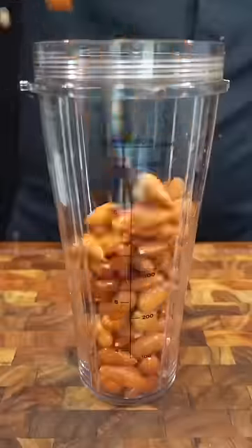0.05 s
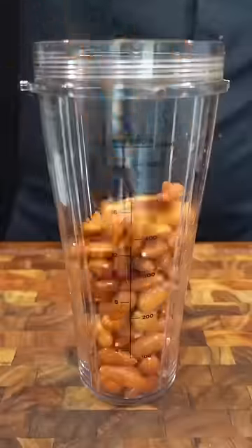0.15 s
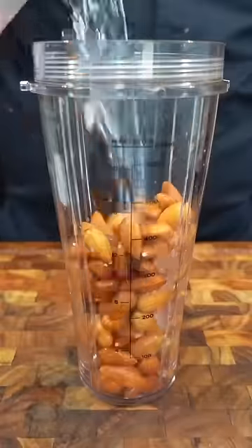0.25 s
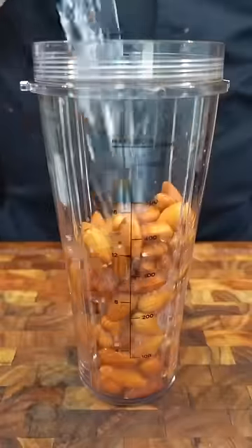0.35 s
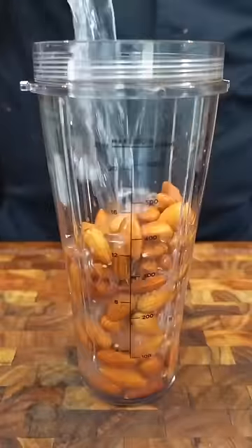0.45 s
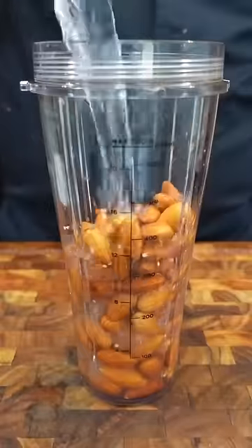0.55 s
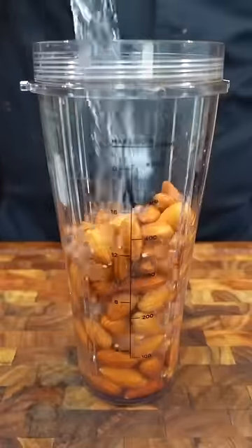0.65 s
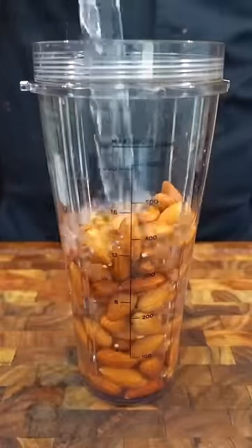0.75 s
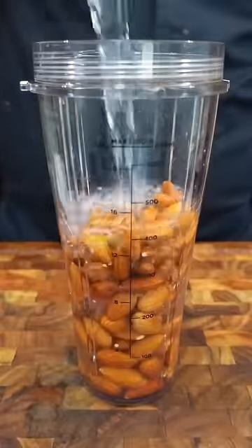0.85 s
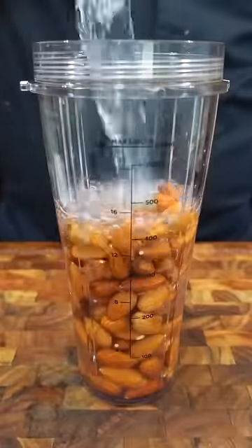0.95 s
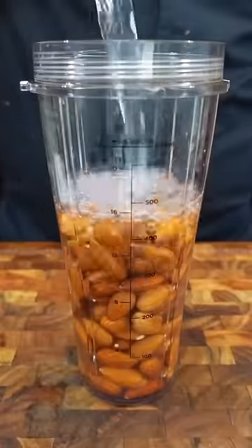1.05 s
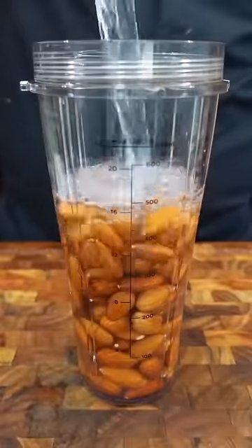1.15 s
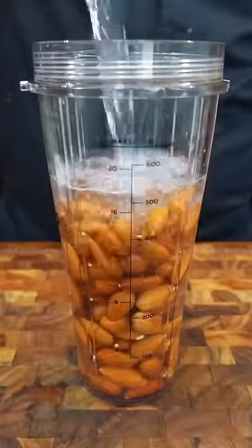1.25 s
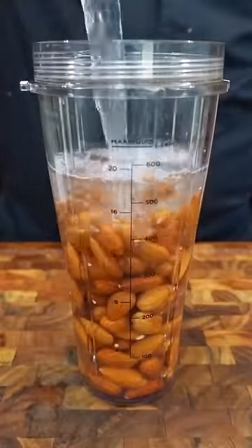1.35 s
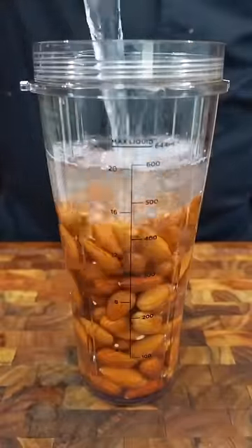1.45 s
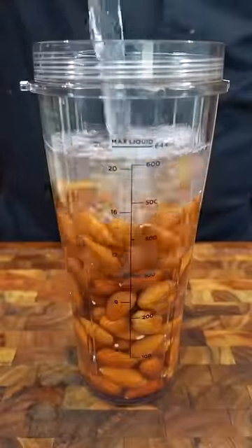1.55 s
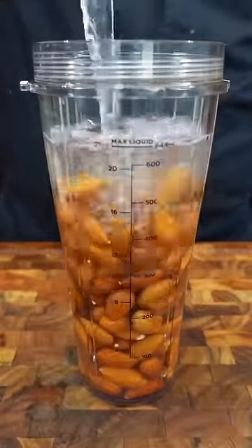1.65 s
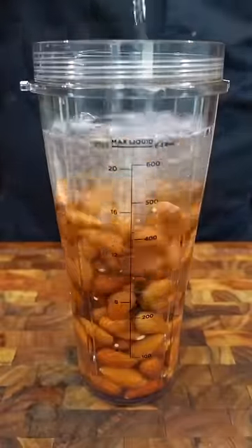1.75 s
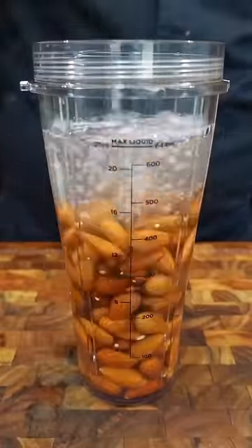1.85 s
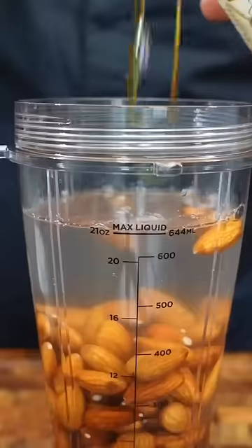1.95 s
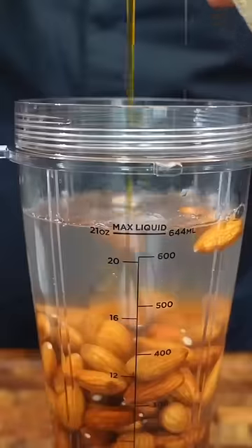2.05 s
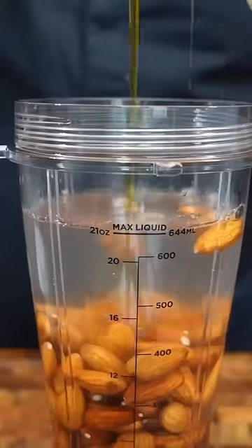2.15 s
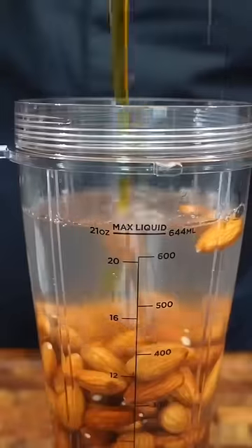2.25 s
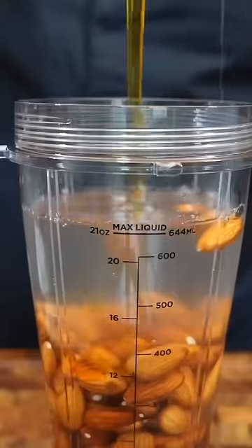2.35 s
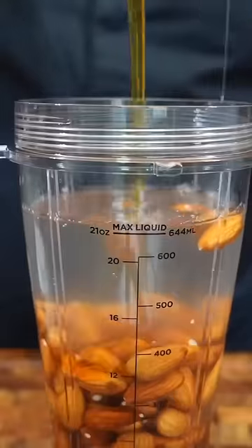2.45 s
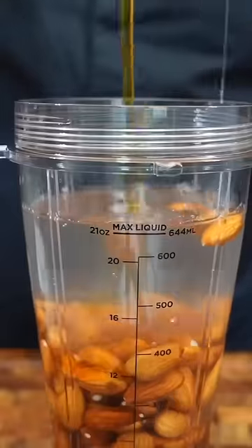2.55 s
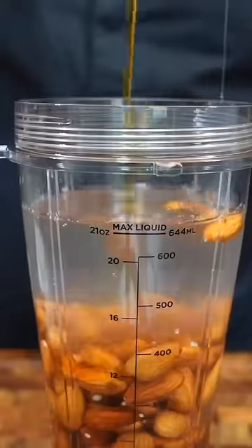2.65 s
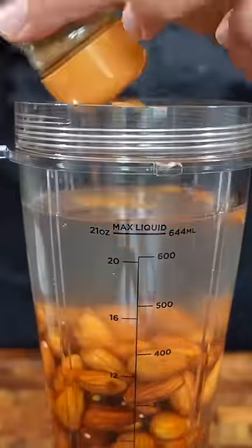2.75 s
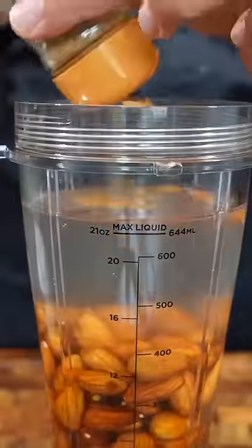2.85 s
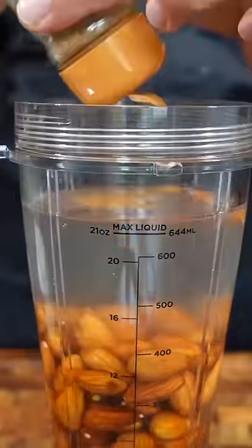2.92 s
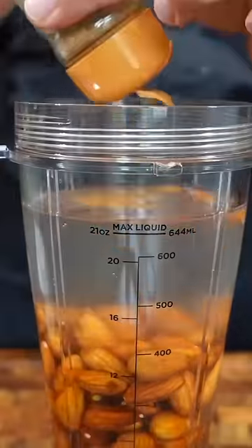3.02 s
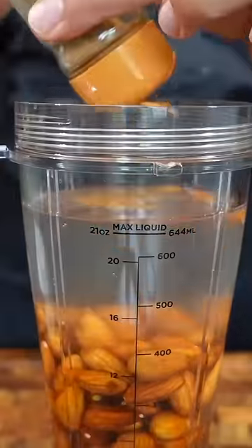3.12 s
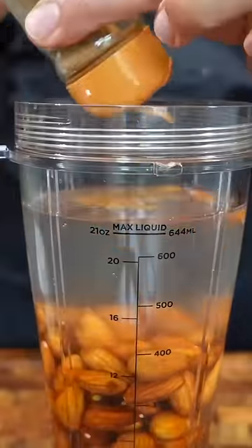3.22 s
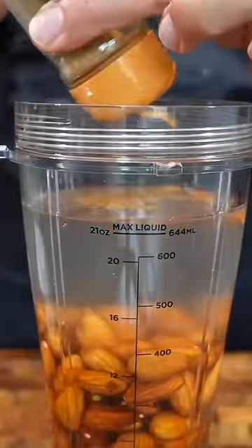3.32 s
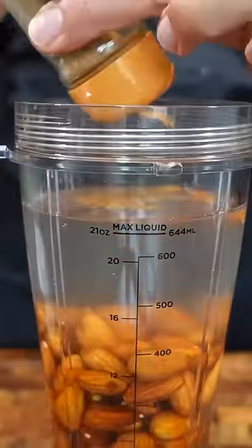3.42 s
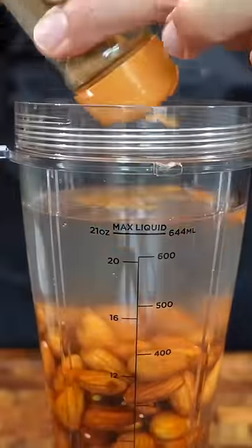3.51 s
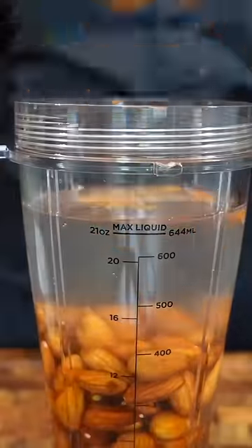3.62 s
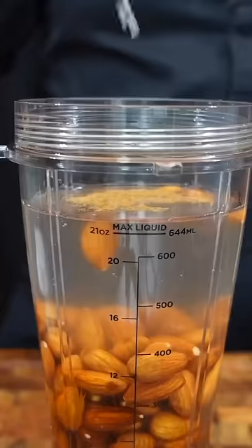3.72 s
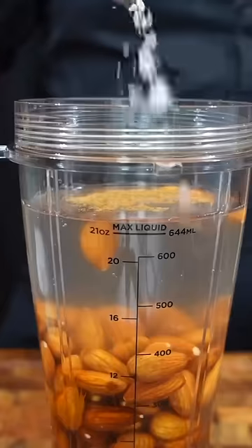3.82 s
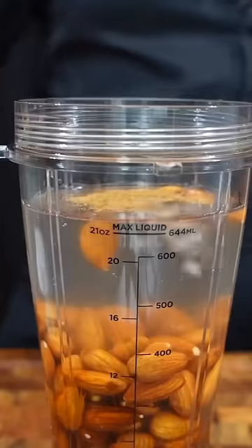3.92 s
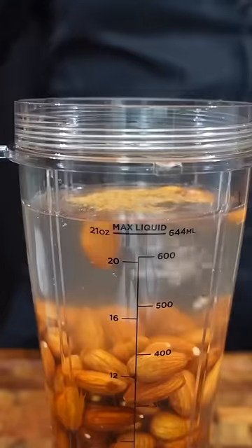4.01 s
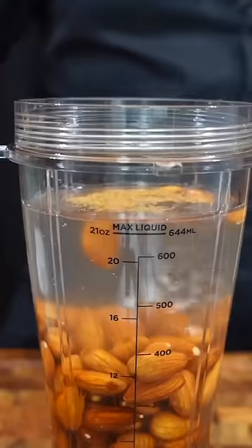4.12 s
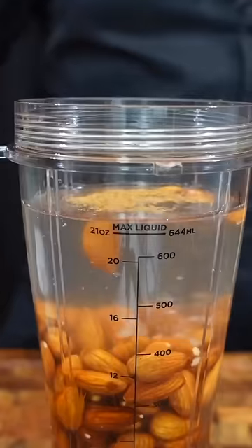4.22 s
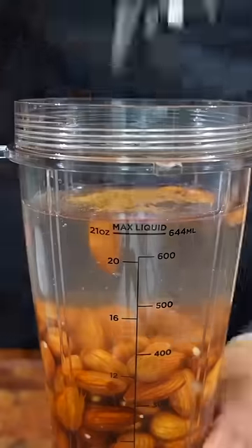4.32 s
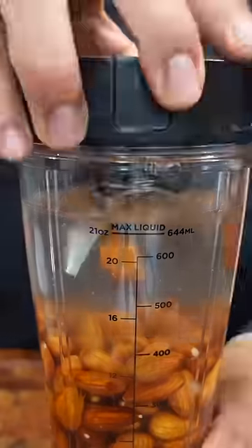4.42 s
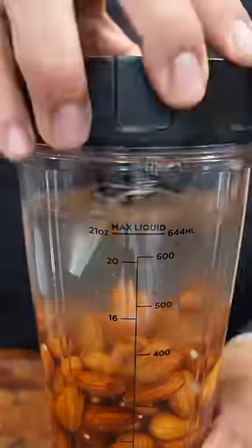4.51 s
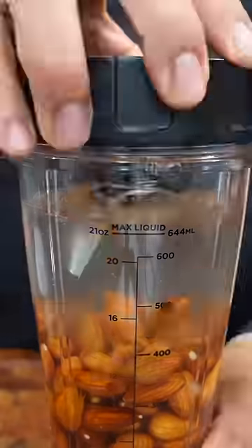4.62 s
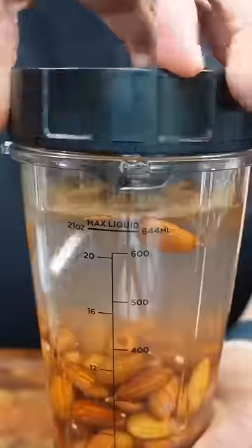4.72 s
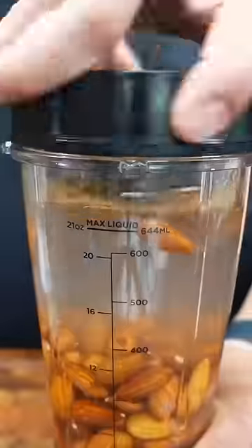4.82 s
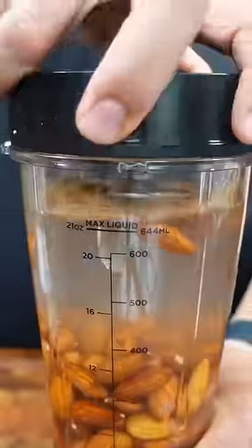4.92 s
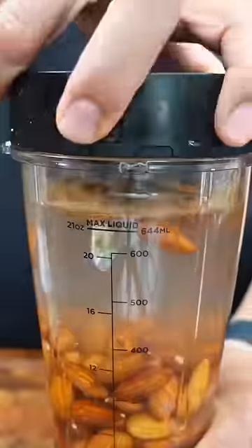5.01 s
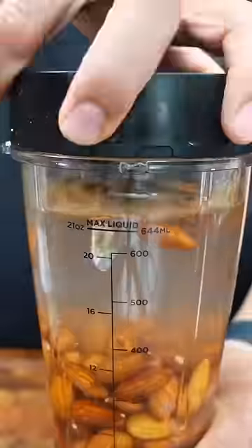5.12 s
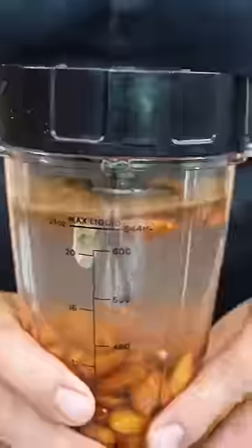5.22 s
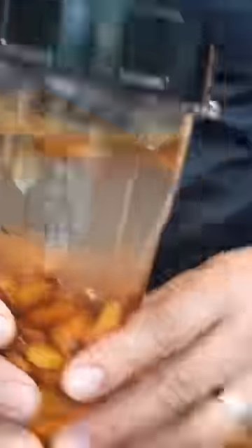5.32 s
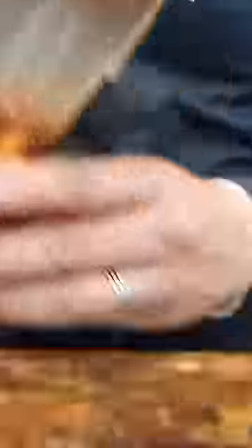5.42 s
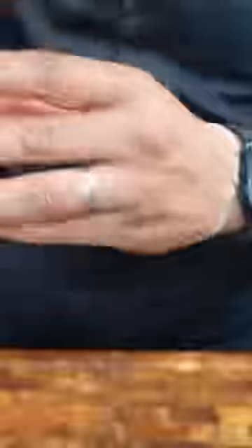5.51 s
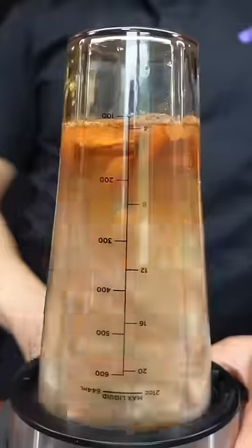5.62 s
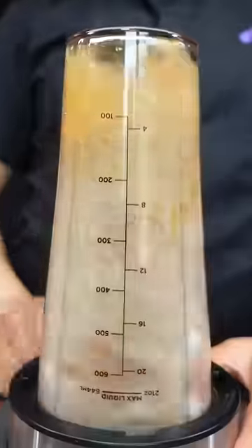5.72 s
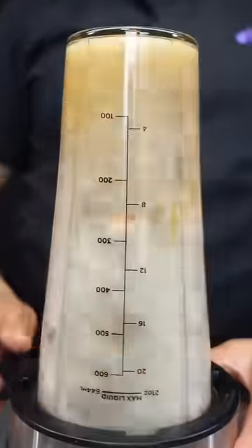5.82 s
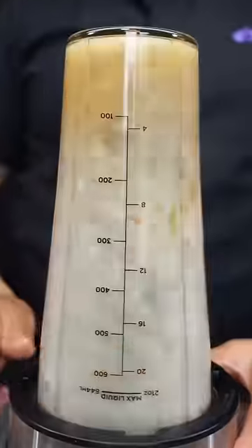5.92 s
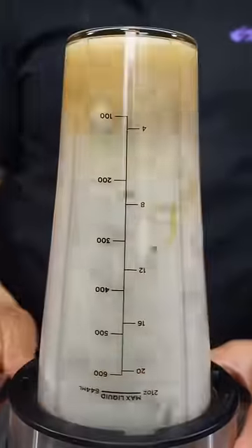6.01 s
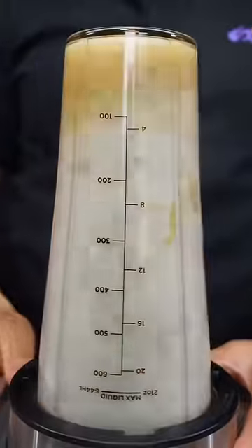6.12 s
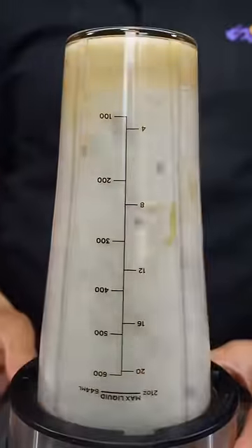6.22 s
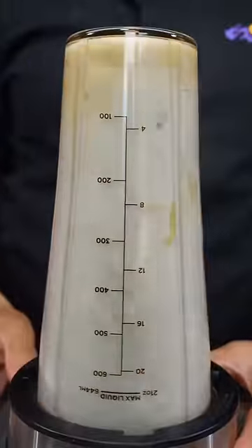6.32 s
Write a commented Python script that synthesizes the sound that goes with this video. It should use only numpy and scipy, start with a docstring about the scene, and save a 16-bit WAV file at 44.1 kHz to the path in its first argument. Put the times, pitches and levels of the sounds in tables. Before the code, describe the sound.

A close microphone in a small, lightly reverberant kitchen catches hard nuts tumbling into a plastic cup, then a surging, bubbly water pour. Quiet oil drips follow, then a row of dull finger taps on a jar with sharper ticks at the end. A lid lands with a loud plastic clack and rattle, twists tight with small knocks, and a blender motor bursts on, churning wet, crunchy nuts while its pitch climbs.

```python
"""In a small kitchen, close to the microphone, nut milk is made in a personal blender.
Almonds drum into the plastic cup as short blows and rings; water and oil follow as noise, drops and bubbles.
A spice jar is tapped with dull thumps and bright ticks, and a pinch of salt patters down.
The blade lid knocks on and is screwed tight with scrapes and clicks; then the motor's tones and
restless noise chop the nuts, and the motor gains speed as they break up."""
import sys
import numpy as np
from scipy import signal
from scipy.fft import rfft, irfft, next_fast_len
from scipy.io import wavfile
from scipy.ndimage import map_coordinates

SR = 44100
rng = np.random.default_rng(int(sys.argv[2]) if len(sys.argv) > 2 else 0)


def bounce(signal):
    """Save signal as a 16-bit WAV file at the path given by the first command-line argument."""
    frames = np.transpose(np.atleast_2d(signal))
    limited = np.clip(frames, -1, 1)
    pcm = np.round(limited * 32767).astype(np.int16)
    wavfile.write(sys.argv[1], SR, pcm)


N = 280476  # length [samples]


def amp(db):
    """Decibels to gain."""
    return 10 ** (np.asarray(db) / 20)


def unit(x):
    """Scale to rms 1."""
    return x / np.sqrt(np.mean(x ** 2) + 1e-20)


def clock():
    """The time of every sample [s]."""
    return np.arange(N) / SR


def along(points, hz):
    """Read (frequency [Hz], value) points on a log frequency axis."""
    f, v = np.transpose(points)
    return np.interp(np.log(hz + 1), np.log(f + 1), v)


def curves(rows):
    """One value per sample for each column after the time."""
    s, *cols = np.transpose(rows)
    return [np.interp(clock(), s, c) for c in cols]


def during(start, end, rise=0.0093, fall=0.033):
    """A gate with sloping edges, all times in seconds."""
    opening = np.clip((clock() - start) / rise, 0, 1)
    closing = np.clip((end - clock()) / fall, 0, 1)
    return opening * closing


def fade(start, db_per_s):
    """A level in dB that holds at 0 until start, then falls steadily."""
    return -db_per_s * np.maximum(clock() - start, 0)


def stroke(s, db, rise_db_per_s, fade_db_per_s):
    """A gain that climbs to db at time s and dies away."""
    return amp(db - rise_db_per_s * np.maximum(s - clock(), 0) + fade(s, fade_db_per_s))


def wobble(rate):
    """A smooth random curve with rate knots a second."""
    return map_coordinates(rng.standard_normal(int(N * rate / SR) + 4), [clock() * rate])


def add(track, s, sound):
    """Mix a sound into a track at time s."""
    part = track[max(round(s * SR), 0):][:len(sound)]
    part += sound[:len(part)]


def colour(x, spectrum, size=4096):
    """Pass x through a causal, minimum-phase body with the given spectrum."""
    gain = amp(along(spectrum, np.fft.rfftfreq(size, 1 / SR)))
    cepstrum = irfft(np.log(np.maximum(gain, 1e-6)))
    # folding the cepstrum forward puts the response's energy as early as possible
    cepstrum[1:size // 2] *= 2
    cepstrum[size // 2 + 1:] = 0
    response = irfft(np.exp(rfft(cepstrum)))
    return signal.fftconvolve(x, response)[:len(x)]


def patter(spectrum, rate, spread_db, wash):
    """Tiny random impacts, rate a second, over a wash of noise, rms 1."""
    strength = amp(spread_db * np.clip(rng.standard_normal(N), -2, 2))
    hits = (rng.random(N) < rate / SR) * rng.choice([-1, 1], N) * strength
    return unit(colour(unit(hits) + wash * rng.standard_normal(N), spectrum))


def patches(x, depth_db, hz_wide, seconds):
    """Moving liquid and nuts keep shifting the resonances that x passes through."""
    z = signal.stft(x, nperseg=1024)[2]
    across = np.arange(z.shape[0]) * SR / 1024 / hz_wide
    onward = np.arange(z.shape[1]) * 512 / SR / seconds
    rows, columns = np.meshgrid(across, onward, indexing="ij")
    field = map_coordinates(rng.standard_normal(z.shape), [rows, columns], mode="mirror")
    return unit(signal.istft(z * amp(depth_db * field), nperseg=1024)[1][:N])


def blow(spectrum, t60, size=4096):
    """One short contact: a decaying noise burst coloured by a body, peak 1."""
    burst = rng.standard_normal(size) * amp(-60 * np.arange(size) / SR / t60)
    sound = colour(burst, spectrum)
    return sound / np.abs(sound).max()


def ring(hz, t60, glide=0, size=4096):
    """A damped sine whose pitch drifts by the share glide over its t60."""
    t = np.arange(size) / SR
    cycles = hz * t * (1 + glide * np.minimum(t / t60, 1) / 2)
    return np.sin(2 * np.pi * cycles) * np.exp(-np.log(1000) * t / t60)


def swell(length, start_hz, end_hz, flutter):
    """A short wavering tone that rises and fades."""
    pitch = np.linspace(start_hz, end_hz, int(length * SR))
    waver = flutter * wobble(114.3)[:len(pitch)]
    return np.hanning(len(pitch)) * np.sin(2 * np.pi * np.cumsum(pitch) / SR + waver)


def bubbles(start, end, pitch, rate, scatter, cycles, spread_db):
    """A cloud of rising bubble notes around a pitch curve, about rms 1 while it lasts."""
    cloud = np.zeros(N)
    times = np.arange(start, end, 1 / rate)
    for s, (late, high, strong) in zip(times, rng.standard_normal((len(times), 3))):
        hz = np.interp(s, *np.transpose(pitch)) * np.exp(scatter * high)
        note = ring(hz, cycles / hz, glide=0.088, size=1024)
        add(cloud, s + 2 * late / rate, amp(spread_db * min(strong, 2)) * note)
    return unit(cloud) * np.sqrt((end - start) * SR / N)


# how long the small kitchen rings: (frequency [Hz], t60 [s])
WALLS = [(150, 0.27), (1000, 0.33), (7000, 0.28), (13000, 0.14)]


def room(x, wet_db):
    """The sound x with the kitchen's short tail, a noise that decays at its own rate in each band."""
    hz, t, z = signal.stft(rng.standard_normal(SR // 2), SR, nperseg=256)
    decay = np.exp(-np.log(1000) * t / along(WALLS, hz)[:, None])
    tail = signal.istft(z * decay, SR, nperseg=256)[1]
    return x + amp(wet_db) * signal.fftconvolve(x, tail / np.linalg.norm(tail))[:N]


def widen(x, side_db):
    """Only the treble scatters differently to the left and the right."""
    steep = signal.ellip(10, 0.5, 80, 4200, "high", fs=SR, output="sos")
    turn = np.exp(2j * np.pi * wobble(150))  # a randomly turning phase
    turned = np.real(signal.hilbert(x, next_fast_len(N))[:N] * turn)
    side = amp(side_db) * signal.sosfilt(steep, turned)
    return np.array([x + side, x - side])


# spectrum of the room air: (frequency [Hz], relative level [dB per Hz])
KITCHEN_AIR = [(15, -31), (25, -12), (168, -11.5), (208, -5.5), (301, -14), (436, -7.5), (568, -11),
               (702, -5), (1220, -18), (1470, -19), (4360, -34.5), (5250, -32), (5990, -34), (12600, -38.5),
               (14000, -53)]
# spectrum of the faint ticking: (frequency [Hz], relative level [dB per Hz])
TICKING = [(300, -41), (1200, -1.5), (1750, 1.5), (2300, -10.5), (2900, -9.5), (3500, -26.5), (6000, -45)]
TICKING_DB, TICKING_LOUD_DB = -64, -59
TICKING_LOUD_START_S, TICKING_LOUD_END_S = 1.95, 3.78


def kitchen():
    """The quiet air of the room is coloured noise; faint, uneven, fast clicks tick in the background."""
    air = amp(-52.5 + 0.44 * wobble(4.66)) * unit(colour(rng.standard_normal(N), KITCHEN_AIR))
    # about 52 ticks a second
    beats = np.diff(np.floor(np.cumsum(52 + 2.5 * wobble(30)) / SR), prepend=0)
    ticking = unit(colour(beats * amp(1.5 * wobble(50)), TICKING))
    louder = during(TICKING_LOUD_START_S, TICKING_LOUD_END_S)
    return air + amp(TICKING_DB + (TICKING_LOUD_DB - TICKING_DB) * louder) * ticking


# modes of the plastic cup: (frequency [Hz], level [dB], t60 [s])
CUP_MODES = [(230.3, -8, 0.4), (305, -5, 0.4), (519, -9.5, 0.3), (800, -4, 0.31), (996, -2, 0.36),
             (1300, -2, 0.4), (1470, -1, 0.43), (2550, -3, 0.2), (4230, -10, 0.39), (4460, -9, 0.45)]


def cup_ring():
    """The cup's modes after one blow, in a slightly new balance each time."""
    return sum(amp(db + rng.normal(0, 2)) * ring(hz, t60, size=12000) for hz, db, t60 in CUP_MODES)


# single almonds striking the cup wall: (time [s], level [dB])
NUT_HITS = [(0.029, -3), (0.036, -5), (0.056, -5), (0.065, -8), (0.077, -3.5), (0.096, -7.5), (0.106, -10),
            (0.121, -5.5), (0.141, -12.5), (0.252, -5)]
# the cup's bottom hums as nuts land: (time [s], length [s], start pitch [Hz], end pitch [Hz], level [dB])
BOTTOM_HUMS = [(0.214, 0.079, 262, 246, -28.5)]
# spectrum of the heap of nuts: (frequency [Hz], relative level [dB per Hz])
NUTS = [(29, -57), (50, -25), (125, -15.5), (345, -27.5), (437, -5), (528, -14), (580, 2.5), (770, -19),
        (929, -13), (2220, -17), (2620, -15), (3910, -16.5), (4510, -25), (10300, -36), (14000, -61.5)]
# spectrum of a hard clack, for nuts and water drops: (frequency [Hz], relative level [dB per Hz])
CLACK = [(40, -63), (200, -33.5), (800, -2), (1500, -3), (2800, -5), (4100, -7.5), (5000, -17.5),
         (14000, -46)]
# the heap drums steadily, then dies away as it settles
HEAP_DB, HEAP_SETTLES_S, HEAP_FADE_DB_PER_S, HEAP_END_S = -16, 0.082, 155, 0.287
NUT_HZ, NUT_SCATTER = 2800, 0.3  # a nut's own note, and its spread in log pitch
NUT_RING_DB = -36  # the cup's ring, re the hit


def almonds():
    """A heap of nuts drums into the cup as dense impacts; single nuts clack and ring, the last one late."""
    heap_gain = amp(HEAP_DB + fade(HEAP_SETTLES_S, HEAP_FADE_DB_PER_S))
    heap = heap_gain * patter(NUTS, rate=700, spread_db=2.5, wash=0.65)
    hits = np.zeros(N)
    for s, db in NUT_HITS:
        hz = NUT_HZ * np.exp(NUT_SCATTER * rng.standard_normal())
        add(hits, s, amp(db) * (blow(CLACK, t60=0.012) + 0.45 * ring(hz, t60=0.009)))
        add(heap, s, amp(db + NUT_RING_DB) * cup_ring())
    for s, length, start_hz, end_hz, db in BOTTOM_HUMS:
        add(hits, s, amp(db) * swell(length, start_hz, end_hz, flutter=0.41))
    return heap * during(0, HEAP_END_S, rise=0.00075, fall=0.01) + room(hits, wet_db=-20)


# the bubble cloud drops as the nuts go under, climbs as the cup fills: (time [s], centre pitch [Hz])
BUBBLE_PITCH = [(0.95, 3570), (1.06, 2360), (1.9, 3070)]
# the loudest single drops: (time [s], level [dB], pitch [Hz])
DROPS = [(0.621, -19.5, 1130), (0.704, -15, 1260), (0.781, -16, 1240), (0.838, -11.5, 3540),
         (0.886, -19, 3250), (0.949, -22.5, 3980), (1.03, -22, 2240), (1.271, -22.5, 2620),
         (1.335, -18.5, 2540), (1.36, -24.5, 2680), (1.721, -22.5, 1860), (1.804, -16.5, 1874)]
# air pockets that gulp: (time [s], length [s], start pitch [Hz], end pitch [Hz], level [dB])
GULPS = [(0.342, 0.12, 818, 689, -31.5), (1.428, 0.086, 493, 467, -35.5)]
# the jet surges: (time [s], gain [dB])
SURGES = [(0.395, 3.5), (0.55, 2), (0.775, 7), (1.1, 8.5), (1.345, 3), (1.45, 6.5), (1.625, 9.5),
          (1.79, 7.5), (1.9, 6.5)]
# spectra of the splash and of the fine spray: (frequency [Hz], relative level [dB per Hz])
SPLASH = [(59, -65), (100, 0), (193, -12.5), (596, -8.5), (652, -10.5), (733, -8), (834, -11.5), (1280, -1),
          (1440, -8.5), (2200, -18.5), (2860, -34), (4840, -120)]
SPRAY = [(2240, -25), (3800, -2), (4960, -6), (6040, -7), (6990, -0.5), (8330, -9), (9490, -1.5),
         (12700, -7.5), (13400, -13), (14000, -12.5)]
# the jet's layers: (level on bare nuts [dB], change once they are covered [dB], share of a surge [ratio])
SPLASH_LAW = (-35.0, -12, 0.75)
BUBBLE_LAW = (-34.5, -7, 0.8)
SPRAY_LAW = (-34.8, -17.5, 1.15)
# between the two middle times the rising water covers the nuts
POUR_START_S, COVER_START_S, COVER_END_S, POUR_END_S = 0.28, 0.86, 1.17, 1.98
POUR_RISE_S, POUR_FALL_S = 0.08, 0.08
SURGE_S = 0.028  # half width of a surge, where its dB gain has dropped to 1/e
FLOW_WOBBLE_DB, FLOW_WOBBLE_PER_S = 1.3, 22  # the jet's small random swings


def water():
    """The jet splashes on the nuts and drives ringing bubbles into the rising water."""
    covered = np.clip((clock() - COVER_START_S) / (COVER_END_S - COVER_START_S), 0, 1)
    surge_db = FLOW_WOBBLE_DB * wobble(FLOW_WOBBLE_PER_S)
    for s, db in SURGES:
        surge_db += db * np.exp(-((clock() - s) / SURGE_S) ** 2)
    splash_gain, bubbles_gain, spray_gain = [
        amp(bare_db + change_db * covered + share * surge_db)
        for bare_db, change_db, share in (SPLASH_LAW, BUBBLE_LAW, SPRAY_LAW)]

    large_pitch, bead_pitch = [(0.3, 1350), (1.9, 1250)], [(0.3, 8000), (1.9, 8000)]
    large = bubbles(0.3, 2.0, large_pitch, rate=220, scatter=0.18, cycles=24, spread_db=5)
    small = bubbles(0.3, 2.0, BUBBLE_PITCH, rate=260, scatter=0.11, cycles=48, spread_db=6)
    froth = bubbles(0.3, 1.8, BUBBLE_PITCH, rate=1200, scatter=0.248, cycles=22, spread_db=1.5)
    beads = bubbles(0.3, 2.0, bead_pitch, rate=600, scatter=0.2, cycles=70, spread_db=5)

    splash = 0.75 * patter(SPLASH, rate=400, spread_db=3.5, wash=0.47) + 0.59 * large
    mist = patter(SPRAY, rate=1300, spread_db=6.5, wash=0.91)
    spray = 0.89 * patches(mist, depth_db=3.0, hz_wide=600, seconds=0.04) + 0.52 * beads
    jet = splash_gain * splash + bubbles_gain * (0.61 * small + 0.42 * froth) + spray_gain * spray
    jet *= during(POUR_START_S, POUR_END_S, rise=POUR_RISE_S, fall=POUR_FALL_S)

    for s, db, hz in DROPS:
        drop = 0.81 * ring(hz, t60=0.027, glide=0.067) + 0.55 * blow(CLACK, t60=0.024)
        add(jet, s, amp(db) * drop)
    for s, length, start_hz, end_hz, db in GULPS:
        add(jet, s, amp(db) * swell(length, start_hz, end_hz, flutter=1.6))
    # such small bubbles radiate no bass
    no_bass = signal.butter(N=3, Wn=220, btype="high", fs=SR, output="sos")
    return room(signal.sosfilt(no_bass, jet), wet_db=-8.5)


# oil drips: (time [s], level [dB])
DRIPS = [(2.084, -22), (2.101, -33.5)]
# spectra of a drip and of the oil stream: (frequency [Hz], relative level [dB per Hz])
PLIP = [(2000, -20), (3300, 6), (4200, 1), (6000, -18), (11000, -16), (14000, -30)]
OIL = [(59, -55), (100, -15), (212, -40), (326, -0.5), (736, -17.5), (815, -21), (1110, -5), (1960, -40),
       (2300, -15), (3600, -32.5), (13000, -43)]


def oil():
    """Two drips tick as short blows, and a thin stream trickles softly into the water."""
    drips = np.zeros(N)
    for s, db in DRIPS:
        add(drips, s, amp(db) * blow(PLIP, t60=0.0084))
    stream = amp(-51.5 + 2.9 * wobble(8.18)) * patter(OIL, rate=250, spread_db=4.0, wash=1.0)
    return stream * during(1.943, 2.79, rise=0.12) + room(drips, wet_db=-17)


# a finger taps the spice jar, harder towards the end: (time [s], thump level [dB], tick level [dB])
TAPS = [(2.81, -33, -56), (2.923, -21.5, -29), (3.038, -26.5, -39), (3.136, -22, -36), (3.237, -20, -25),
        (3.339, -19, -31), (3.442, -17.5, -21), (3.545, -16, -10.5)]
# spectra of the jar's knock, its bright tick and the powder: (frequency [Hz], relative level [dB per Hz])
JAR_KNOCK = [(100, -24), (350, -3.5), (650, 3.5), (1000, -10), (2500, -19), (6000, -37)]
JAR_TICK = [(1000, -29), (2500, -20), (5200, -22), (6300, -3), (7400, -5), (8800, -6.5), (10200, -5.5),
            (14000, -23)]
POWDER = [(59, -55), (100, -10), (166, -9), (399, -1.5), (510, -3), (798, -7.5), (979, -1), (1500, -11.5),
          (1770, -17), (2500, -16), (5420, -42), (7660, -32.5), (13000, -38)]
PUSH_S, PUSH_START_HZ, PUSH_END_HZ = 0.0165, 320, 122  # the thump's length and falling pitch
FIRM_TAP_DB = -18  # the thump of a firm tap
KNOCK_DB, KNOCK_GROWS = -19.5, 1.5  # the jar's knock at a firm tap, and its dB per dB of thump
PUFF_DB, PUFF_S = -26.5, 0.038  # the powder's puff re the tick, and its decay time to 1/e


def spice():
    """Each tap thumps the jar, clicks its cap and puffs out powder; harder taps are mostly brighter."""
    thumps, notes, ticks, puffs = np.zeros((4, N))
    puff = np.exp(-np.arange(SR // 2) / SR / PUFF_S)
    for s, db, tick_db in TAPS:
        knock_db = KNOCK_DB + KNOCK_GROWS * (db - FIRM_TAP_DB)
        # a short dull push that sags in pitch, then the jar's faint note
        push = swell(PUSH_S, PUSH_START_HZ, PUSH_END_HZ, flutter=0)
        add(thumps, s - 0.002, amp(db) * push)
        add(notes, s, amp(db - 22) * ring(292, t60=0.4, size=8192))
        add(thumps, s, amp(knock_db) * blow(JAR_KNOCK, t60=0.015))
        add(ticks, s, amp(tick_db) * blow(JAR_TICK, t60=0.017))
        add(puffs, s, amp(tick_db + PUFF_DB) * puff)
    hiss = puffs * patter(JAR_TICK, rate=2200, spread_db=2, wash=0.67)
    powder = amp(-45.5 + 1.9 * wobble(14)) * patter(POWDER, rate=1500, spread_db=6.5, wash=0.96)
    powder *= during(2.8, 3.78, rise=0.024)
    return room(thumps, wet_db=-15) + notes + ticks + hiss + powder


def salt():
    """A pinch of crystals lands on the water as a brief bright patter."""
    crystals = patter(SPRAY, rate=360, spread_db=-7, wash=0.69)
    return amp(-50.5) * crystals * during(3.925, 4.01, rise=0.043, fall=0.058)


# the lid lands and bounces: (time [s], thud level [dB], clack level [dB])
LID_HITS = [(4.488, -19.5, -4), (4.505, -11.5, -13.5), (4.511, -11, -9.5), (4.519, -14, -7.5),
            (4.526, -21, -11)]
# spectra of the lid's thud, its clack and the rattling cup: (frequency [Hz], relative level [dB per Hz])
THUD = [(40, -40), (120, 1), (400, 2.5), (700, -7.5), (1300, -18), (4000, -70)]
LID_CLACK = [(40, -64), (300, -25), (900, -1), (1700, -0.5), (2600, -5), (3500, -14.5), (5500, -22.5),
             (14000, -40)]
CUP_RATTLE = [(24, -44), (40, -20.5), (228, -7.5), (258, -14), (312, 1.5), (354, -8.5), (516, -5.5),
              (692, -19.5), (819, -7), (989, -7), (1350, -15), (1500, -13), (2060, -22.5), (4200, -25),
              (6000, -36.5), (7800, -44), (13200, -120)]
LID_TICK_DB, LID_RING_DB = -11.5, -22  # the rim's tick and the cup's ring, re the clack
# the full cup rattles after the lid lands, until the hand grips it
JOLT_S, GRIP_S = 4.49, 4.752
RATTLE_DB, RATTLE_HOLD_S, RATTLE_FADE_DB_PER_S = -18.0, 0.091, 130
FIZZ_DB, FIZZ_FADE_DB_PER_S = -27, 155


def lid():
    """The lid lands hard and bounces as blows; the full cup rings, rattles and fizzes."""
    hits, cup = np.zeros((2, N))
    for s, thud_db, clack_db in LID_HITS:
        add(hits, s, amp(thud_db) * blow(THUD, t60=0.031))
        add(hits, s, amp(clack_db) * blow(LID_CLACK, t60=0.027))
        add(hits, s, amp(clack_db + LID_TICK_DB) * blow(JAR_TICK, t60=0.018))
        add(cup, s, amp(clack_db + LID_RING_DB) * cup_ring())
    # sloshing water roughens the ring, and the gripping hand stops it
    cup *= 1 + 0.3 * wobble(80)
    rattle_gain = amp(RATTLE_DB + fade(JOLT_S + RATTLE_HOLD_S, RATTLE_FADE_DB_PER_S))
    rattle = rattle_gain * patter(CUP_RATTLE, rate=900, spread_db=0, wash=0.92)
    fizz_gain = amp(FIZZ_DB + fade(JOLT_S, FIZZ_FADE_DB_PER_S))
    fizz = fizz_gain * patter(SPRAY, rate=1200, spread_db=1, wash=0.98)
    ungripped = during(JOLT_S, GRIP_S, rise=0.014, fall=0.011)
    return room(hits, wet_db=-9) + (cup + rattle + fizz) * ungripped


# the lid knocks as it seats on its thread: (time [s], level [dB])
THREAD_KNOCKS = [(4.822, -29), (4.842, -18), (4.892, -16), (4.914, -28), (4.976, -30)]
# the thread catches and clicks: (time [s], level [dB])
THREAD_CLICKS = [(4.793, -42), (4.841, -33), (4.955, -29), (5.109, -46), (5.168, -32.5)]
# the wrist twists the lid, and the cup rumbles: (time [s], level [dB])
TWISTS = [(4.843, -35.5), (4.915, -38), (4.99, -34)]
# spectra of a knock, the twisted cup's rumble and the scrape: (frequency [Hz], relative level [dB per Hz])
THREAD_KNOCK = [(40, -25), (130, 1), (420, 3), (700, -6.5), (1750, -7.5), (2400, -24.5), (6000, -38)]
RUMBLE = [(30, -23), (90, 0), (170, -4.5), (400, -21.5), (900, -27.5), (2500, -58)]
THREAD_SCRAPE = [(290, -34), (500, -13), (544, 1), (739, -25), (1050, -8), (1440, -21), (1630, -11.5),
                 (2160, -18.5), (8940, -21.5), (14000, -37)]
TWIST_RISE_DB_PER_S, TWIST_FADE_DB_PER_S = 600, 132
# the thread scrapes most as it bites, then less as the lid slows
SCRAPE_PEAK_S, SCRAPE_DB = 4.85, -38
SCRAPE_RISE_DB_PER_S, SCRAPE_FADE_DB_PER_S = 380, 68


def thread():
    """A few twists screw the lid tight: it knocks, rumbles, scrapes and clicks along its thread."""
    hits = np.zeros(N)
    for s, db in THREAD_KNOCKS:
        add(hits, s, amp(db) * blow(THREAD_KNOCK, t60=0.027))
    for s, db in THREAD_CLICKS:
        add(hits, s, amp(db) * blow(JAR_TICK, t60=0.014))
    twisting = sum(stroke(s, db, TWIST_RISE_DB_PER_S, TWIST_FADE_DB_PER_S) for s, db in TWISTS)
    rumble = twisting * patter(RUMBLE, rate=200, spread_db=5.0, wash=0.7)
    scraping = stroke(SCRAPE_PEAK_S, SCRAPE_DB, SCRAPE_RISE_DB_PER_S, SCRAPE_FADE_DB_PER_S)
    scrape = scraping * patter(THREAD_SCRAPE, rate=1200, spread_db=0, wash=0.88)
    return room(hits, wet_db=-13) + (rumble + scrape) * during(4.77, 5.22)


# the motor speeds up as the nuts break: (time [s], mean shaft speed [Hz])
SHAFT = [(5.63, 135.2), (5.8, 152.2), (6.1, 157.4), (6.3, 167.6), (6.36, 169.3)]
# partials of the blade tone: (multiple of the shaft speed [ratio], relative level [dB])
BLADE_ORDERS = [(2, -14.5), (3, -0.5), (4, -5), (6, -11), (7, -8), (10, -6.5), (15, -6.5), (16, -8.5),
                (24, -4.5), (25, -8.5), (26, -10)]
# spectra of the churned water and the chopped nuts: (frequency [Hz], relative level [dB per Hz])
CHURN = [(18, -61), (30, -30), (107, -21), (133, -20), (162, -19.5), (178, -17), (194, -17.5), (255, -22),
         (299, -13.5), (371, -12), (478, -3), (542, -3.5), (709, -8.5), (1650, -8.5), (2200, -14),
         (2860, -31), (4840, -120)]
CHOP = [(1180, -31), (2000, -10.5), (2190, -17.5), (2470, -2.5), (2880, -8.5), (3260, -6), (3420, -3),
        (3960, -1.5), (4660, -6.5), (5850, -17.5), (6720, -15.5), (10400, -28.5), (12900, -39),
        (13300, -43), (14000, -59)]
MOTOR_ON_S, SPIN_UP_S = 5.625, 0.023
CHURN_DB, CHOP_DB = -16.5, -14.7
CHOP_FADE_DB_PER_S = 3.0  # the pieces get smaller
BITE_DB, BITE_S = 2.5, 0.044  # extra churning as the blades first bite, and its decay time to 1/e
# the unbalance hum swells as the shaft nears the resonance of the base
BASE_HZ, BASE_WIDTH_HZ, HUM_DB = 167.7, 1.83, -20
BLADE_DB, BLADE_DB_PER_HZ = -20.5, 0.3  # the blade tone at that speed, and its growth with speed


def blender():
    """Blades churn the water and fling nut pieces at the wall; the motor's tones emerge as it speeds up."""
    shaft_hz, = curves(SHAFT)
    running_s = np.maximum(clock() - MOTOR_ON_S, 0)
    angle = 2 * np.pi * np.cumsum(shaft_hz * (1 + 0.0053 * wobble(40))) / SR
    blades = np.zeros(N)
    for order, db in BLADE_ORDERS:
        # the uneven load makes every partial flutter, in phase the high ones most
        blades += amp(db + 4.55 * wobble(30)) * np.sin(order * (angle + 0.04 * wobble(60)))
    off_base_hz = shaft_hz - BASE_HZ
    hum = amp(HUM_DB) / np.hypot(1, off_base_hz / BASE_WIDTH_HZ) * np.sin(angle)
    tones = hum + amp(BLADE_DB + BLADE_DB_PER_HZ * off_base_hz) * blades

    slosh = patter(CHURN, rate=2500, spread_db=4.5, wash=0.83)
    slosh = patches(slosh, depth_db=2.0, hz_wide=220, seconds=0.045)
    churn = amp(CHURN_DB + BITE_DB * np.exp(-running_s / BITE_S) + 0.39 * wobble(35)) * slosh

    pieces = patter(CHOP, rate=2200, spread_db=3.5, wash=0.6)
    pieces = patches(pieces, depth_db=2.1, hz_wide=250, seconds=0.06)
    # pieces are struck in bunches as the blades come round
    bunches = 1 + 0.051 * np.sin(2 * angle)
    chop = amp(CHOP_DB - CHOP_FADE_DB_PER_S * running_s + 0.21 * wobble(60)) * bunches * pieces
    return (tones + churn + chop) * np.minimum(running_s / SPIN_UP_S, 1)


def scene():
    """All the steps in turn, straight in front of the microphone."""
    handling = kitchen() + almonds() + oil() + spice() + salt() + lid() + thread()
    return widen(handling, side_db=-8.5) + widen(water(), side_db=-8.0) + widen(blender(), side_db=-6.0)


TOP_HZ = 13700  # the band limit


def record(dry):
    """Peaks round off at full scale; a steep filter cuts what lies above the band limit."""
    held = dry / (1 + np.abs(dry) ** 8) ** (1 / 8)
    size = next_fast_len(N + SR // 4)
    passband = 1 / (1 + (np.fft.rfftfreq(size, 1 / SR) / TOP_HZ) ** 80)
    return irfft(rfft(held, size) * passband, size)[:, :N]


dry = scene()
out = record(dry)
bounce(out)
```